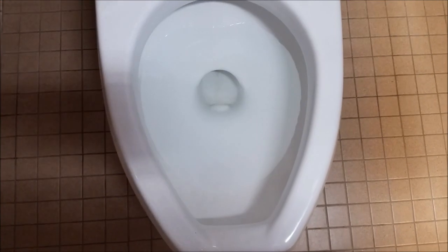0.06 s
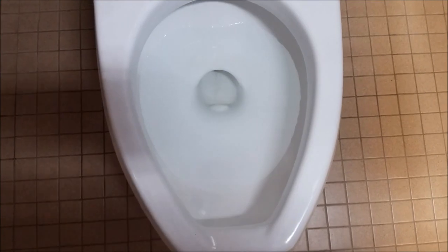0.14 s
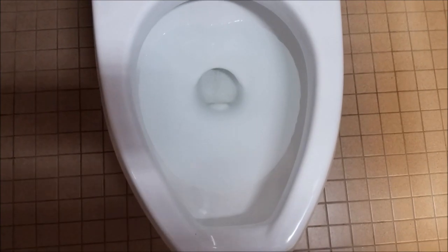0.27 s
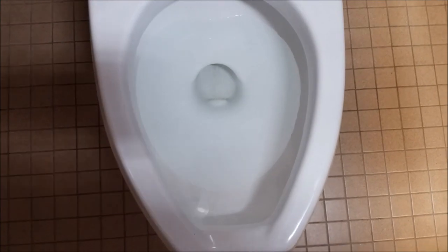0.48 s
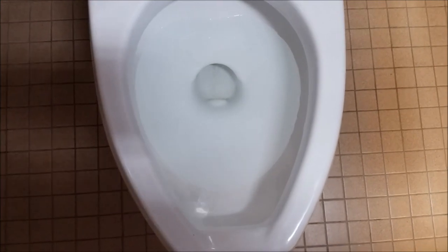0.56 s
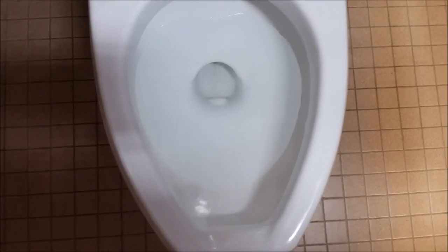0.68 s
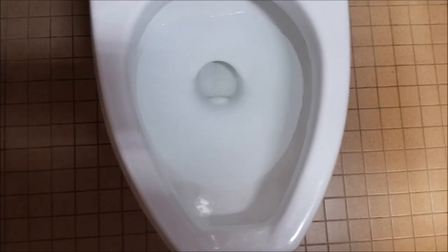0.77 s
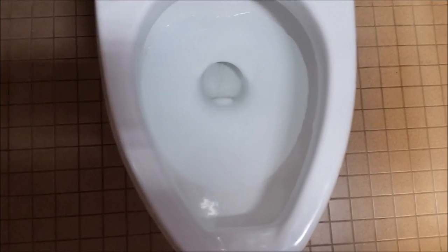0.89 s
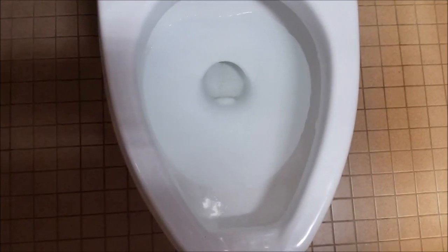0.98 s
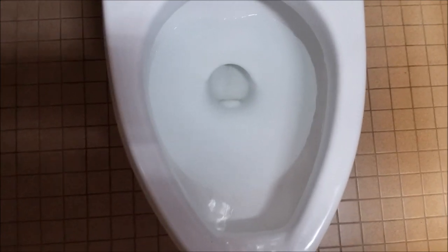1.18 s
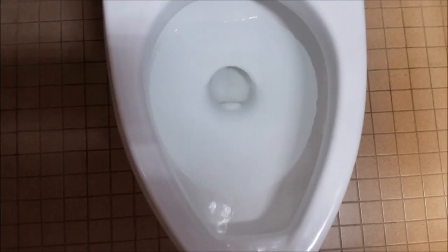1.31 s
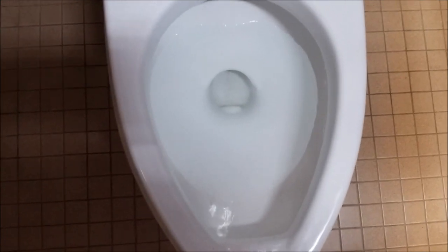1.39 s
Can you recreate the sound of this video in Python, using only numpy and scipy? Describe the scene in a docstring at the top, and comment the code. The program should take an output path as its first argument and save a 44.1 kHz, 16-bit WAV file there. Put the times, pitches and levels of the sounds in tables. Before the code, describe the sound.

A toilet seat or stall door bangs once with a sharp crack that echoes and booms in a small tiled restroom. A few faint, dull knocks follow near the microphone over a quiet ventilation rumble.

```python
"""In a small tiled restroom, a hard object, perhaps a toilet seat or a stall door, bangs once.
Three contacts within 3 ms crack and set it ringing; the tiles throw back a dense echo and the room booms.
A tiny tick comes first; faint dull knocks, a thin tone and a soft rustle follow.
Ventilation rumbles throughout, and an expander (an automatic volume control) lowers the quiet parts."""
import sys
import numpy as np
from scipy import signal
from scipy.fft import rfft, irfft
from scipy.io import wavfile

SR = 44100
rng = np.random.default_rng(int(sys.argv[2]) if len(sys.argv) > 2 else 0)


def unload_audio(sound):
    """Save the sound as a 16-bit wav file, at the path given as the first command line argument."""
    columns = np.transpose(np.atleast_2d(sound))
    # keep every value between -1 and 1, then stretch to whole-number steps
    steps = np.round(np.clip(columns, -1, 1) * 32767)
    wavfile.write(sys.argv[1], SR, steps.astype(np.int16))


N = 63945

# the contacts that make up the bang (delay [s], level [dB], push length [s])
BANG_CONTACTS = [(0.0, -3, .00012), (.002, -2.5, .00014), (.0027, -7.5, .00014)]
# the notes the struck object rings with (pitch [Hz], level [dB], time to fade by 60 dB [s])
OBJECT_NOTES = [(663, -29, 0.036), (1008, -30.5, .05), (1434, -23.5, .04), (1820.4, -24.5, 0.11),
                (2283, -16, .03), (2570, -15.5, .02), (2894, -6, 0.02), (3340, -25, 0.011),
                (3980, -23.5, .02), (4400, -23.5, .02), (5100, -30.5, .012)]
# the crack's colour: how strong its lows and highs are (frequency [Hz], relative level [dB])
CRACK_COLOUR = [(100, -23), (600, -12.5), (1500, 3), (2900, 4), (3700, -7.5), (4600, -11.5), (6500, -31.5),
                (9000, -49), (15000, -55)]


def struck_object():
    """Each contact cracks and rings the object, which gives off little bass and little high treble."""
    t = since(0)[:SR // 1000]
    blow = amp(-1) * click(CRACK_COLOUR) + ring(OBJECT_NOTES)
    out = 0
    for delay, db, push_s in BANG_CONTACTS:
        push = np.exp(-(2 * (t - push_s) / push_s) ** 2)  # a longer push sounds duller
        softened = np.convolve(blow, push / push.sum())[:N]
        out = out + amp(db) * at(softened, delay)
    return out


def bang():
    """The object is struck once, and the stall, the tiles and the air in the room answer."""
    bass_cut = signal.butter(3, 550, "high", fs=SR, output="sos")
    treble_cut = signal.butter(6, 6100, "low", fs=SR, output="sos")
    nearby = signal.sosfilt(np.vstack([bass_cut, treble_cut]), struck_object() + stall_echo())
    room = tile_echo() + room_ring() + at(room_boom(), start=.002)
    return at(nearby + room, start=.2397)


# the colour of the bang's echoes (frequency [Hz], relative level [dB])
ECHO_COLOUR = [(40, -23), (150, -1), (215, -9.5), (270, -21), (350, -12), (420, -15), (620, -9.5),
               (800, -9), (1150, -12), (1750, -2), (2100, -12.5), (2450, -3), (2900, -2.5), (3350, -9.5),
               (3650, -23), (4300, -13.5), (5100, -27), (5600, -28), (6500, -46.5), (7600, -47),
               (9500, -63)]
ECHO_SWELL_S = .0045


def stall_echo():
    """The first reflections bounce off the stall and die quickly."""
    return amp(-16) * noise(ECHO_COLOUR) * fade(t60=.14) * swell(ECHO_SWELL_S)


# how the room holds its lows and highs (frequency [Hz], time to fade by 60 dB [s], swell time [s])
ROOM_BANDS = [(100, 1, 0.069), (300, 0.69, 0.0056), (780, 0.59, 0.0019), (1640, .55, 0.0056),
              (2880, 0.56, 0.0024), (4530, .45, .003), (9000, .45, 0.0032)]


def tile_echo():
    """Countless reflections blur into noise; each band swells and dies at its own rate, the bass last."""
    spectrum = rfft(noise(ECHO_COLOUR), 2 * N)
    out = 0
    for hz, t60, swell_s in ROOM_BANDS:
        share = along([(row[0], row[0] == hz) for row in ROOM_BANDS])  # 1 here, 0 at the other bands
        band = irfft(spectrum * share)[:N]
        out = out + band * fade(t60) * swell(swell_s)
    return amp(-24.5) * out


# notes that linger in the room (pitch [Hz], level [dB], time to fade by 60 dB [s])
ROOM_NOTES = [(313, -50, .8), (340, -42, .35), (484, -42, .65), (532, -46, .6), (602, -40, .6),
              (682, -40, .4), (969, -38, .3), (1160, -39, .3), (1357, -33, .25), (1508, -34, .35),
              (1572, -40, .5), (1707, -33, .26), (1782, -31, .35), (2180, -34, .2), (2314, -34, .22),
              (2541, -33, .3), (2670, -42, .55), (2744, -30, .28), (2806, -31, .22), (2885, -31, .2),
              (2938, -25, .24), (3036, -37, .29)]


def room_ring():
    """The room keeps ringing at a few sharp pitches."""
    return ring(ROOM_NOTES) * swell(ECHO_SWELL_S)


# the room's deep notes (pitch [Hz], level [dB], time to fade by 60 dB [s], swell time [s])
BOOM_NOTES = [(75, -29.5, 0.78, 0.069), (130.7, -31, 0.52, 0.022), (171.4, -30, 0.59, 0.013),
              (196, -36.5, 1, 0.004)]


def room_boom():
    """Low sound bouncing between the walls builds up into standing waves."""
    return sum(ring([(hz, db, t60)]) * swell(swell_s) for hz, db, t60, swell_s in BOOM_NOTES)


# the knocks after the bang (time [s], level [dB], echo level relative to the knock [dB])
KNOCK_HITS = [(.424, -19, -26), (.497, -9.5, -36), (.822, -20, -35.5), (.957, -22, -33), (1.0355, -22, -39)]
# the colour of a knock (frequency [Hz], relative level [dB])
KNOCK_COLOUR = [(60, -7), (170, -18), (300, 1), (600, 5), (1000, 1), (1450, 1.5), (1900, -6), (2800, -8),
                (3700, -29), (7000, -65)]


def knocks():
    """Soft, dull blows, each with a short echo."""
    blow = click(KNOCK_COLOUR)
    out = 0
    for start, db, echo_db in KNOCK_HITS:
        echo = amp(echo_db) * noise(KNOCK_COLOUR) * fade(t60=.28)
        out = out + at(amp(db) * (blow + echo), start)
    return out


# the colour of the tick (frequency [Hz], relative level [dB])
TICK_COLOUR = [(200, -5), (1500, 8.5), (3500, 7.5), (5200, 2), (7500, -22), (15000, -35)]


def tick():
    """One tiny tick close by, just before the bang."""
    return at(amp(-34) * click(TICK_COLOUR), start=.0472)


# how the thin tone rises and falls (time [s], level [dB])
TONE_LOUDNESS = [(.81, -86), (.85, -58), (.93, -67), (1.02, -58.5), (1.12, -58.5), (1.2, -70), (1.3, -64),
                 (1.45, -69)]


def thin_tone():
    """A faint pure note hangs on around the late knocks."""
    pitch_hz = 526
    return level_curve(TONE_LOUDNESS) * np.sin(2 * np.pi * pitch_hz * since(0))


# the colour of the rustle (frequency [Hz], relative level [dB])
RUSTLE_COLOUR = [(300, -24), (900, -5.5), (1700, 3), (2600, -4), (4500, -9.5), (7000, -33), (14000, -34.5)]


def rustle():
    """A faint puff of noise swells near the end."""
    peak_s, width_s = 1.405, .094
    return amp(-64) * noise(RUSTLE_COLOUR) * np.exp(-((since(0) - peak_s) / width_s) ** 2)


# the colour of the ventilation and microphone hiss (frequency [Hz], relative level [dB])
AIR_COLOUR = [(15, -16), (27, 1.5), (70, -0.5), (100, -4.5), (160, -2.5), (260, -14.5), (520, -15.5),
              (750, -20.5), (1100, -25.5), (2200, -31), (3600, -32), (5000, -36.5), (7500, -44.5),
              (11800, -38.5), (15500, -40.5)]
# the hiss that differs between left and right (frequency [Hz], relative level [dB])
WIDE_HISS_COLOUR = [(1500, -39), (3500, -6), (6000, -0.5), (12000, -6), (15500, -1)]
# how both drift in loudness (time [s], relative level [dB])
AIR_DRIFT = [(0, 4), (.22, 5), (.5, 4), (.75, 2), (1.0, 2.5), (1.25, 3), (1.45, 3)]


def ventilation():
    """Moving air rushes softly in the centre, with a trace of hiss out to the sides."""
    air = amp(-53.5) * noise(AIR_COLOUR)
    wide_hiss = amp(-82) * noise(WIDE_HISS_COLOUR) * np.array([[1], [-1]])
    return (air + wide_hiss) * level_curve(AIR_DRIFT)


# the colour of the deep rumble (frequency [Hz], relative level [dB])
RUMBLE_COLOUR = [(12, -27.5), (28, 3.5), (43, 0), (72, -5.5), (110, -23), (300, -57.5)]
# how the rumble rises and falls (time [s], level [dB])
RUMBLE_LOUDNESS = [(0, -49), (.06, -43.5), (.2, -55), (.55, -52), (.8, -62.5), (1.1, -54), (1.22, -49),
                   (1.35, -45.5), (1.45, -48)]


def rumble():
    """Very low noise comes and goes under everything."""
    return noise(RUMBLE_COLOUR) * level_curve(RUMBLE_LOUDNESS)


# the balance of the microphone's two openings (frequency [Hz], left minus right level [dB])
LEFT_RIGHT_BALANCE = [(60, 0.0), (110, 0.0), (200, 0.0), (380, 0.0), (700, -0.5), (1290, 0.0), (2380, -0.5),
                      (4400, -0.5), (8120, -3), (15000, -0.5)]


def left_and_right(x):
    """The two openings hear one sound, the right with slightly more treble."""
    tilt_db = along(LEFT_RIGHT_BALANCE) / 2
    return irfft(rfft(x, 2 * N) * amp([tilt_db, -tilt_db]))[:, :N]


def amp(db):
    """Turns decibels into a number to multiply by."""
    return 10 ** (np.asarray(db) / 20)


def since(start):
    """Seconds since a moment, zero before it."""
    return np.maximum(np.arange(N) / SR - start, 0)


def at(x, start):
    """The sound, delayed by start seconds."""
    return np.concatenate([np.zeros(max(int(start * SR), 0)), x])[:N]


def fade(t60):
    """Dies away by 60 dB every t60 seconds."""
    return np.exp(-np.log(1000) * since(0) / t60)


def swell(seconds):
    """Rises from 0 towards 1, about two thirds of the way in the given time."""
    return 1 - np.exp(-since(0) / seconds)


def ring(notes):
    """Pure notes that start together and die away."""
    return sum(amp(db) * fade(t60) * np.sin(2 * np.pi * hz * since(0)) for hz, db, t60 in notes)


def along(points):
    """Joins (frequency [Hz], value) points into a curve over all frequencies."""
    hz, value = np.array(points, float).T
    return np.interp(np.log(np.fft.rfftfreq(2 * N, 1 / SR) + 1), np.log(hz), value)


def level_curve(points):
    """Joins (time [s], level [dB]) points into a volume curve."""
    return amp(np.interp(since(0), *np.array(points, float).T))


def noise(colour):
    """Noise of this colour, scaled to a typical size (rms) of 1."""
    random_phases = np.exp(2j * np.pi * rng.random(N + 1))
    x = irfft(amp(along(colour)) * random_phases)[:N]
    return x / x.std()


def click(colour):
    """The shortest click that has this colour."""
    cepstrum = irfft(np.log(amp(along(colour))))
    # folding the second half onto the first packs the energy at the start
    cepstrum[1:N] *= 2
    cepstrum[N + 1:] = 0
    return irfft(np.exp(rfft(cepstrum)))[:N]


def scene():
    """The bang, knocks and tick sit near the centre, over the background."""
    return left_and_right(bang() + knocks() + tick()) + thin_tone() + rustle() + ventilation() + rumble()


def record(dry):
    """An expander lowers the volume while all above the bass is quiet; the highest treble is cut."""
    threshold_db, cut_per_db, max_cut_db = -48, .57, 6.5
    window = int(.02 * SR)
    bass_cut = signal.butter(2, 300, "high", fs=SR, output="sos")
    above_bass = signal.sosfilt(bass_cut, dry.mean(axis=0))
    power = signal.fftconvolve(above_bass ** 2, np.ones(window) / window)[:N]
    level_db = 10 * np.log10(np.maximum(power, 1e-12))
    gain = amp(np.clip((level_db - threshold_db) * cut_per_db, -max_cut_db, 0))
    treble_cut = signal.ellip(10, .1, 70, 15800, fs=SR, output="sos")
    return signal.sosfilt(treble_cut, dry * gain)


dry = scene()
out = record(dry)
unload_audio(out)
```